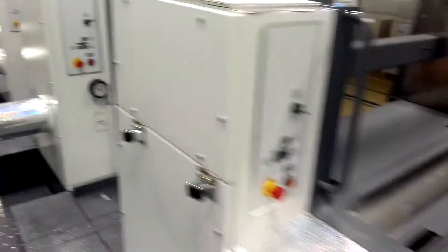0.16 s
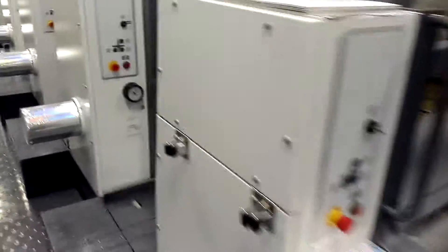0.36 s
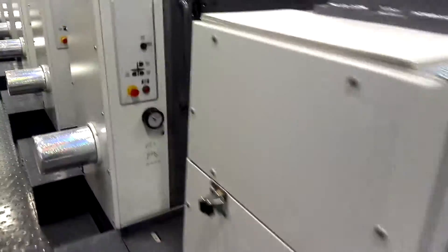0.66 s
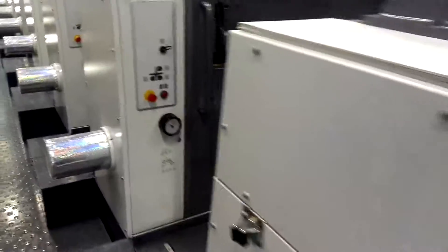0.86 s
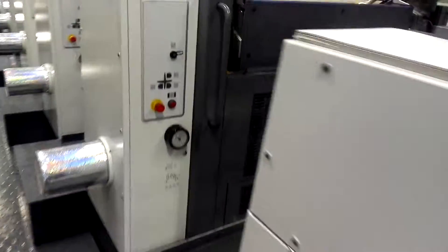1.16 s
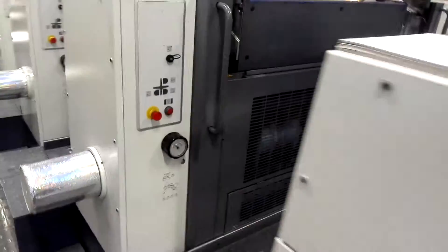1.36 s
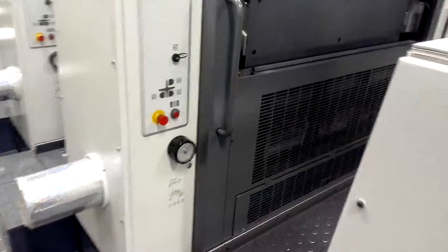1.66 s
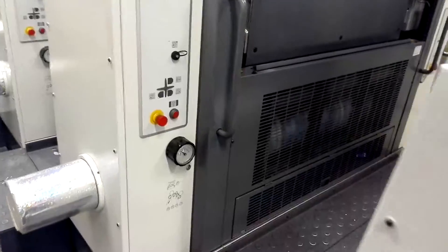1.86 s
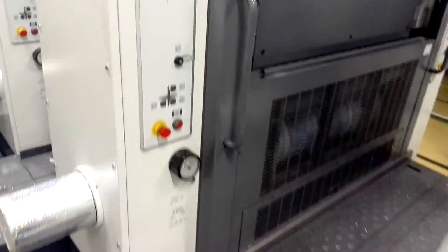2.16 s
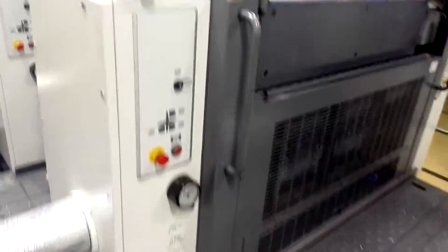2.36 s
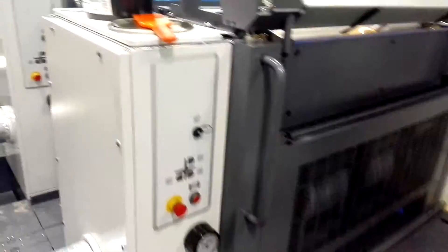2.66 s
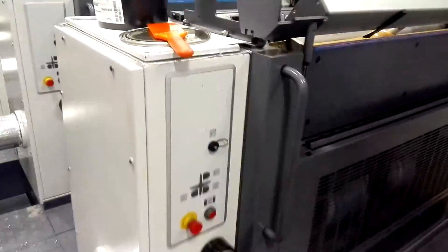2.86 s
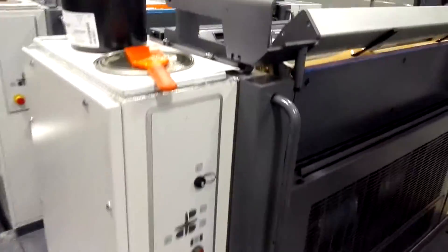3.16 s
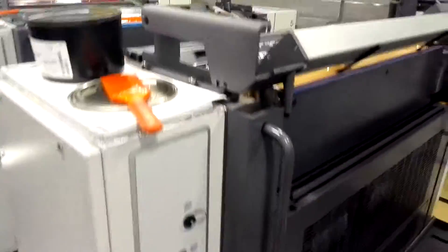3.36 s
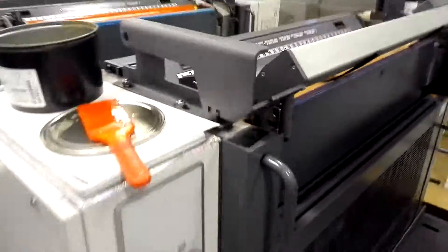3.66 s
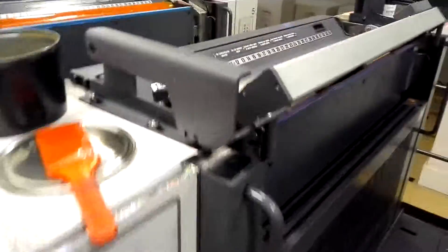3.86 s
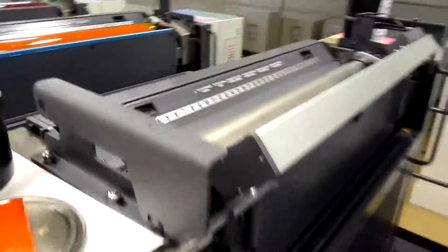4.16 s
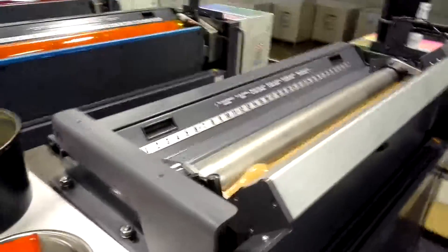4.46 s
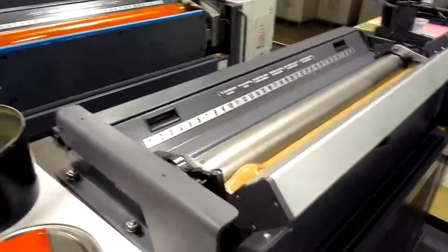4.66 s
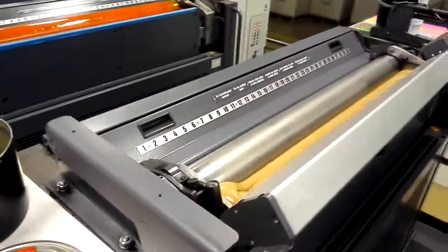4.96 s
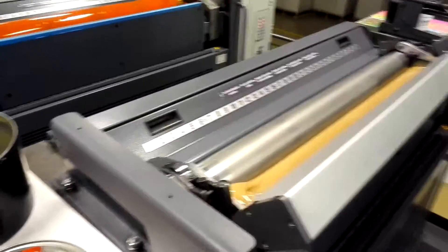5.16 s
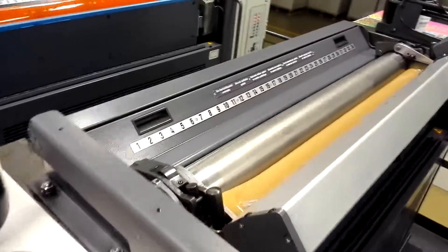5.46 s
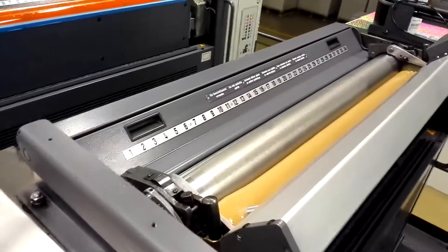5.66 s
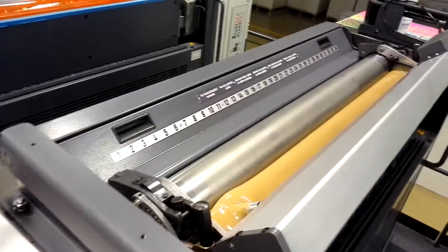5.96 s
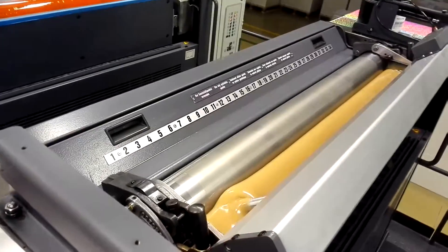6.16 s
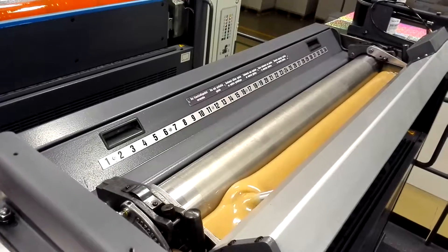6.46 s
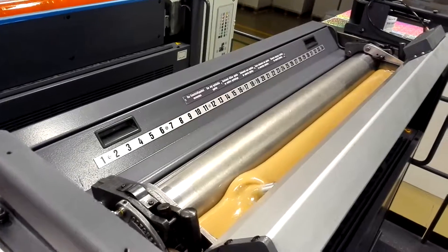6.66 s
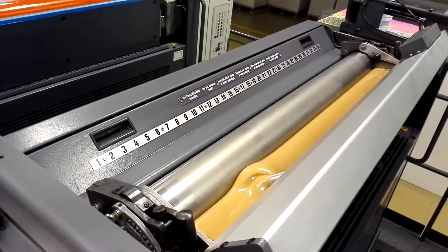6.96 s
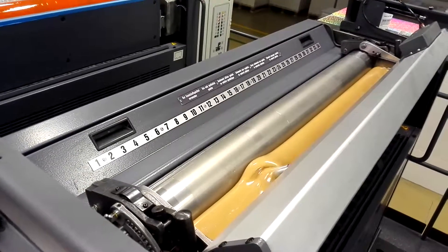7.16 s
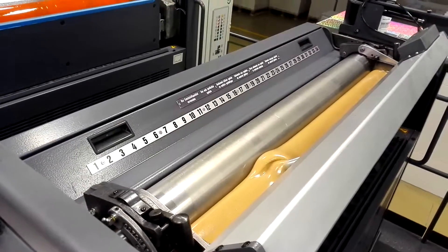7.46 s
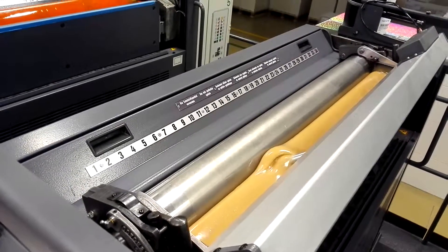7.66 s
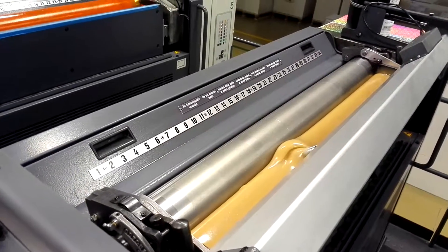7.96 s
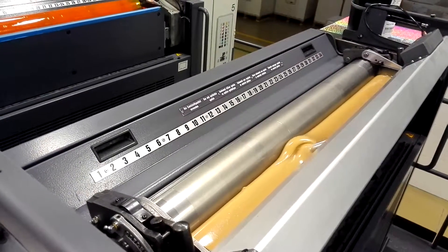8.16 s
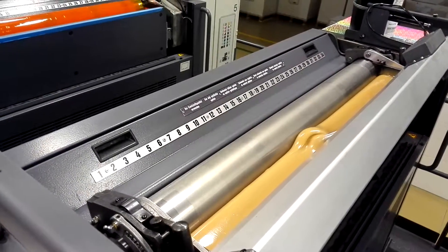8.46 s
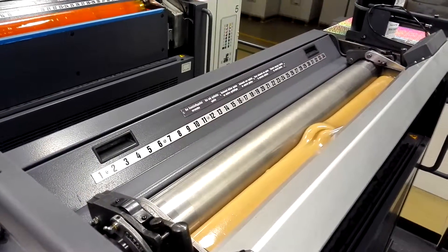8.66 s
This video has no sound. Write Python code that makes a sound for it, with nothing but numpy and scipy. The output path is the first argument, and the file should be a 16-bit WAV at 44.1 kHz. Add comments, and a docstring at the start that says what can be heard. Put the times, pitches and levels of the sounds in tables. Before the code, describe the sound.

Close, wide stereo sound of printing machinery at constant speed. Broad motor and blower noise fills the space, its grinding texture recurring each turn of the cylinders. Five clacks per turn rattle through steel, with dull frame knocks and faint loose ticking. Low hum swells and fades, and thin whines persist. After moving out from between cabinets the roar eases a little, then hiss slowly grows over the ink trough.

```python
"""Printing press, close pair on the move

A sheet-fed press runs in a hall; two spaced microphones move from beside its cabinets to above an ink fountain.
Motors and blowers make a steady din of shaped noise, and looped noise brings much of the rumble back each turn
of the cylinders. Gears hum and whine as wavering sines. Grippers and cams clack five times a turn as noise
bursts through steel resonances; the frame knocks in decaying low sines and loose parts tick faintly."""
import sys
import numpy as np
from scipy import signal
from scipy.fft import rfft, irfft
from scipy.io import wavfile
from scipy.ndimage import uniform_filter1d

SR = 44100
rng = np.random.default_rng(int(sys.argv[2]) if len(sys.argv) > 2 else 0)


def store_pcm(level_fs):
    """Save levels as 16-bit WAV."""
    pcm = np.round(np.clip(level_fs, -1, 1) * 32767).astype(np.int16)
    wavfile.write(sys.argv[1], SR, np.atleast_2d(pcm).T)


N = 388962  # samples

SHEETS_PER_S = 2.8357  # turns of the cylinders a second

# Spectra of the din; each layer's level is set apart: (frequency [Hz], relative density [dB per Hz])
RUMBLE_SHAPE = [(12, -50), (22, -23), (32, -36), (45, -28), (58, -26), (75, -19.5), (90, -6.5), (100, -1.5),
                (125, -2), (165, -2.5), (250, -3), (300, -1), (345, -4.5), (385, -12.5), (470, -22.5),
                (610, -55)]  # frames and floor
ROAR_SHAPE = [(300, -28), (420, -2.5), (480, -8), (590, -7), (700, -6), (800, -2), (900, -3), (1330, -5.5),
              (1620, -5), (1900, -8.5), (2400, -17), (3100, -53)]  # blowers and rollers
HISS_SHAPE = [(1290, -19), (2200, 2.5), (3200, 2), (3640, 2), (4270, 0), (5770, 0), (7070, -4),
              (7600, -11.5), (9880, -69), (16700, -120)]  # air jets and tacky ink
SIZZLE_SHAPE = [(5530, -50), (9400, -5.5), (9800, -1), (10300, -2), (13300, -10.5), (14300, -16.5)]  # top of the hiss
SIZZLE_DB = -43.5  # mean level of the sizzle
# Levels of the din: (dB between the cabinets, dB out in the open)
RUMBLE_DB, ROAR_DB, HISS_DB = (-20.4, -22.5), (-25, -26.5), (-28.5, -31)
STEP_OUT_S = (2.6, 2.7)  # the microphones leave the cabinets: (from s, to s)
HISS_CREEP_DB_PER_S = 0.18  # growth of the hiss from then on, leaning in over the rollers

# Likeness of the two microphones: (frequency [Hz], left-right likeness [0-1])
LIKENESS = [(20, .995), (60, .995), (140, .97), (210, .92), (320, .72), (490, .3), (1000, .25), (2000, .2),
            (4000, .1), (14000, .08)]
# Balance of the two microphones: (frequency [Hz], left-right difference [dB])
BALANCE = [(60, 0), (740, 0), (1130, -2.5), (1710, -4), (2610, -1.5), (3960, -2.5), (6030, -5),
           (9160, -2.5), (13900, 0)]
# Phase between the spaced microphones: (frequency [Hz], lead of the left [rad])
LEFT_LEAD = [(60, 0), (340, -.1), (450, .2), (600, 1), (1030, 1.1), (1810, -1.4), (2840, -3.9), (7920, -22),
             (14100, -38)]
# Balance as the pair turns: (time [s], left-right difference [dB])
HEADING_PATH = [(0, -5), (1.2, -3.5), (2.6, -4), (3.6, -5), (5.2, -2.5), (6.2, -3.5), (8.82, -5)]
# Place of the pair: (time [s], height [0 beside the cabinets to 1 above the fountain])
HEIGHT_PATH = [(0, 0.34), (2.3, 0.0096), (3.6, 1), (8.82, 1)]

# Noise that recurs with the cylinders: (frequency [Hz], share of power recurring each turn [0-1])
RECURRING = [(95, .2), (125, .7), (380, .7), (450, .35), (2400, .3)]
# Change of the recurring pattern along the walk: (time [s], patterns passed [count])
PATTERN_PATH = [(0, 0), (5, 4), (8.82, 4.8)]

# Motor hum, swelling and fading unevenly as motors beat: (time [s], level [dB])
HUM_LEVEL = [(0, -34), (.2, -29), (.55, -25.5), (1.05, -48), (1.85, -39), (2.1, -25.5), (2.5, -22),
             (2.8, -33.5), (3.5, -37.5), (4.05, -30), (4.6, -37), (5.45, -27.5), (6.2, -48), (7, -27.5),
             (7.9, -50), (8.25, -23), (8.45, -41), (8.82, -36)]
HUM_HZ, HUM_LAG = 108.5, .04  # lag: radians by which the right trails
# Drive gear tone, without its sidebands: (time [s], level [dB])
DRIVE_LEVEL = [(0, -27.5), (.8, -35), (1.6, -25), (2.6, -27), (3.6, -35.5), (4.6, -33.5), (8.82, -34)]
# Uneven load on the drive gear: (offset from its tone [turn rates], level against the tone [dB])
LOAD_SIDEBANDS = [(1, -4), (3, -8), (5, -5), (-5, -9), (-1, -10)]
CALM_S, CALM_DB = (3.6, 3.7), -12  # the throb weakens above the fountain: (from s, to s), by dB
# Tooth mesh, before its swell: (time [s], level [dB])
MESH_LEVEL = [(0, -41), (.6, -46), (1.15, -30.5), (2.2, -34.5), (2.7, -42), (3.6, -48), (4.05, -36),
              (4.9, -41), (5.6, -51), (8.82, -50)]
# Whine at twice the mesh: (time [s], level [dB])
DOUBLE_MESH_LEVEL = [(0, -30), (.7, -44), (1.15, -32), (1.8, -49), (2.4, -27.5), (2.9, -35.5), (3.2, -34),
                     (4.5, -44), (5.3, -31), (6.2, -29.5), (7.6, -31.5), (8.82, -31.5)]
MESH_TEETH, MESH_PEAK = 144, .42  # teeth a turn; share of the turn at which they bear hardest
MESH_THROB, MESH_LAG = .7, -.5  # depth of that swell, 0-1; radians by which the right trails
# Fainter whines, about which the level drifts: (frequency [Hz], level beside the cabinets [dB],
# level above the fountain [dB], left-right difference [dB], lag of the right [rad])
FAINT_WHINES = [(794.4, -43, -42, -1, -.9), (1224.9, -40, -47, 0, -.3), (1384, -46, -52, -5, 1),
                (1633.5, -47, -46, -4, -1.9), (1667.5, -45, -44, -6, -1.1), (2042, -52, -50, -2, -1.8),
                (2361.5, -51, -52, -4, -1.9)]

# Clacks in one turn: (place [share of the turn], mean level beside the cabinets [dB],
# mean level above the fountain [dB], t60 [s], brightness [dB per octave], left-right difference [dB])
CAM_CLACKS = [(.092, -21, -20, 0.21, -3, -2.5), (.232, -25, -23, 0.1, -1.5, -3.5),
              (.445, -19, -20, .1, -2, -1.5), (.6, -44, -24.5, 0.088, 2, -4),
              (.845, -25, -23, 0.17, 1, -2.5)]
# Resonances of the steel: (frequency [Hz], width at -6 dB [Hz], relative level [dB])
STEEL_MODES = [(1600, 500, -3.5), (2924, 340, 3), (3660, 410, 5), (4450, 1400, -4), (5530, 2300, 1),
               (10200, 2400, -10)]
# Knocks in one turn: (place [share of the turn], mean level beside the cabinets [dB],
# mean level above the fountain [dB], frequency [Hz], t60 [s])
FRAME_KNOCKS = [(.0, -36, -24, 312, 0.082), (.11, -31, -27, 289, 0.17), (.11, -39, -23, 136, 0.064),
                (.28, -18, -24, 163, 0.18), (.44, -27, -12, 213, 0.061), (.5, -13, -25, 158.4, 0.21),
                (.52, -23, -22, 315.3, 0.13), (.68, -19, -24.5, 326, 0.099), (.69, -22, -21, 193, 0.063),
                (.78, -25, -20, 339, 0.1), (.9, -24, -18, 273, 0.12)]
NEARER_S = .006  # blows arrive this much sooner above the fountain
RATTLES_PER_S, RATTLE_DB = 130, -42  # loose ticks a second; their overall level

GAP_HZ, EDGE_HZ = (7800, 9420), 14250  # a silent band in the treble; the upper band limit


def gain_of(db):
    """Decibels to an amplitude factor."""
    return 10 ** (np.asarray(db) / 20)


def evened(x):
    """Scale to rms 1."""
    return x / np.sqrt(np.mean(x ** 2) + 1e-20)


def read(points, hz):
    """Read a table over frequency, joined on a log axis."""
    f, value = np.transpose(points)
    return np.interp(np.log(hz + 1), np.log(f + 1), value)


def follow(rows, t):
    """Read the columns of a curve at times t."""
    s, *columns = np.transpose(rows)
    return [np.interp(t, s, c) for c in columns]


def height_at(t):
    """Place of the pair: 0 beside the cabinets, 1 above the fountain."""
    return np.clip(follow(HEIGHT_PATH, t)[0], 0, 1)


def sides(db):
    """Gains of left and right for a left-right level difference."""
    return gain_of(np.multiply.outer([.5, -.5], db))


def drift(per_s):
    """Slow chance of rms 1: sines of random phase up to a rate."""
    t = np.arange(0, N + 2048, 1024) / SR
    slow = 0
    for f in per_s * np.geomspace(.1, 1, 20):
        slow = slow + np.sin(2 * np.pi * (f * t + rng.random()))
    return np.interp(np.arange(N) / SR, t, evened(slow))


def pair(hz, one, other):
    """Left and right spectra from two draws, alike and shifted as for spaced microphones."""
    same = np.clip(read(LIKENESS, hz), 0, 1)
    lead = read(LEFT_LEAD, hz)
    right = same * np.exp(-1j * lead) * one + np.sqrt(1 - same ** 2) * other
    mono = np.sqrt(1.001 + same * np.cos(lead))  # dividing by this evens the sum of the two sides
    return np.array([one, right]) * sides(read(BALANCE, hz)) / mono


def din_levels(t):
    """Rumble, roar and hiss drop on stepping out from between the cabinets; then the hiss creeps up."""
    rumble_db, roar_db, hiss_db = (np.interp(t, STEP_OUT_S, ends) for ends in (RUMBLE_DB, ROAR_DB, HISS_DB))
    creep_db = HISS_CREEP_DB_PER_S * np.maximum(t - STEP_OUT_S[1], 0)
    return rumble_db, roar_db, hiss_db + creep_db


def each_turn(rows):
    """Start sample, level at the pair's height and the other columns of every blow."""
    for turn in range(int(N / SR * SHEETS_PER_S) + 1):
        for share, low_db, high_db, *rest in rows:
            s = (turn + share) / SHEETS_PER_S
            height = height_at(s)
            start = max(round((s - NEARER_S * height) * SR), 0)
            yield start, low_db + height * (high_db - low_db), rest


def din():
    """Motors, blowers and air: random short-time spectra in four layers, with patches and a shared flicker."""
    frames, hz = N // 256 + 5, np.fft.rfftfreq(1024, 1 / SR)[:, None]
    a, b, c, d, patches = rng.standard_normal((frames, 513, 5)).T
    patches = uniform_filter1d(patches, size=5, axis=0)  # over frequency
    patches = evened(uniform_filter1d(patches, size=6, axis=1))  # over time
    flicker = evened(uniform_filter1d(rng.standard_normal(frames), size=2))
    t = np.arange(frames) * 256 / SR
    rumble_db, roar_db, hiss_db = din_levels(t)
    sizzle_db = SIZZLE_DB + .4 * (hiss_db - hiss_db.mean())
    # (spectrum, level [dB], patchiness [dB rms], flicker [dB rms])
    layers = [(RUMBLE_SHAPE, rumble_db, .3, .1), (ROAR_SHAPE, roar_db, 1.2, .3),
              (HISS_SHAPE, hiss_db, 1.4, .5), (SIZZLE_SHAPE, sizzle_db, 2.5, .5)]
    power = 0
    for shape, level_db, patchy_db, flicker_db in layers:
        colour = gain_of(2 * read(shape, hz))
        moving_db = level_db + flicker_db * flicker + patchy_db * patches
        power += colour / colour.sum() * gain_of(2 * moving_db)
    # leave room for the share that turning() repeats
    fresh = 1 - read(RECURRING, hz) * (hz < 2400)
    # the bass keeps its balance while the rest swings with the heading
    pan_db = follow(HEADING_PATH, t)[0]
    swing = sides((hz > 450) * (pan_db - pan_db.mean()))
    # the 3 makes up for level lost where random frames overlap
    spectra = pair(hz, a + 1j * b, c + 1j * d) * np.sqrt(3 * power * fresh) * swing
    return signal.istft(spectra, nperseg=1024, noverlap=768)[1][:, :N]


def turning():
    """Gears and bearings grind alike each turn: looped noise patterns that fade into one another along the walk."""
    t, size = np.arange(N) / SR, 2 ** 14  # points in one turn
    hz = np.arange(size // 2 + 1) * SHEETS_PER_S
    place = (t * SHEETS_PER_S % 1 * size).astype(int)
    morph, out = follow(PATTERN_PATH, t)[0], np.zeros((2, N))
    rumble_db, roar_db, _ = din_levels(t)
    for shape, level_db in [(RUMBLE_SHAPE, rumble_db), (ROAR_SHAPE, roar_db)]:
        colour = gain_of(2 * read(shape, hz))
        strength = size * np.sqrt(colour / colour.sum() * read(RECURRING, hz) / 2)
        for k in range(6):
            a, b, c, d = rng.standard_normal((4, len(hz)))
            pattern = irfft(pair(hz, a + 1j * b, c + 1j * d) * strength)
            on = abs(morph - k) < 1
            fade = np.cos(np.pi / 2 * (morph[on] - k))
            out[:, on] += pattern[:, place[on]] * (fade * gain_of(level_db[on]))
    return out


def tone(hz, lag, waver_hz):
    """A sine of rms 1 whose pitch wavers a little, trailing on the right by lag radians."""
    cycles = np.cumsum(hz + waver_hz * drift(2.08)) / SR + rng.random()
    return np.sqrt(2) * np.sin(2 * np.pi * cycles - np.array([[0], [lag]]))


def drive_gear(t):
    """Sidebands at multiples of the turn rate make the drive gear throb, hardest a third into each turn."""
    turn = 2 * np.pi * (SHEETS_PER_S * t - .34)
    throb = sum(gain_of(db) * np.exp(1j * k * turn) for k, db in LOAD_SIDEBANDS)
    throb = 1 + throb * gain_of(np.interp(t, CALM_S, (0, CALM_DB)))
    carrier = np.exp(1j * (111 * turn + np.array([[0], [.3]])))  # 111 cycles a turn; the right leads
    return gain_of(follow(DRIVE_LEVEL, t)[0]) * (throb * carrier).real * np.sqrt(2)


def tooth_mesh(t):
    """Teeth meeting give a tone that swells once a turn, and a whine at twice its pitch."""
    mesh_hz = MESH_TEETH * SHEETS_PER_S
    bearing = 1 + MESH_THROB * np.cos(2 * np.pi * (SHEETS_PER_S * t - MESH_PEAK))
    mesh = gain_of(follow(MESH_LEVEL, t)[0]) * bearing * tone(mesh_hz, MESH_LAG, .06)
    return mesh + gain_of(follow(DOUBLE_MESH_LEVEL, t)[0]) * tone(2 * mesh_hz, MESH_LAG, .06)


def faint_whines(t):
    """Steady higher tones whose levels drift and change with the height of the pair."""
    height, out = height_at(t), 0
    for hz, low_db, high_db, pan_db, lag in FAINT_WHINES:
        level_db = low_db + height * (high_db - low_db) + 2 * drift(2.2)
        out = out + gain_of(level_db) * sides(pan_db)[:, None] * tone(hz, lag, .3)
    return out


def gears():
    """Motor hum, a wavering sine, with the drive gear, tooth mesh and fainter whines."""
    t = np.arange(N) / SR
    hum = gain_of(follow(HUM_LEVEL, t)[0]) * tone(HUM_HZ, HUM_LAG, .06)
    return hum + drive_gear(t) + tooth_mesh(t) + faint_whines(t)


def clacks():
    """Each gripper or cam blow is a rattling noise burst through the steel's broad resonances."""
    t, out = np.arange(4096) / SR, np.zeros((2, N + SR))
    hz = np.fft.rfftfreq(4096, 1 / SR)
    steel = np.sqrt(sum(gain_of(2 * db) / (1 + (2 * (hz - f) / width) ** 2) ** 2
                        for f, width, db in STEEL_MODES))
    for at, db, (t60, tilt_db, pan_db) in each_turn(CAM_CLACKS):
        shared, left, right = rng.standard_normal((3, 4096))
        # the shared part reaches the left 20 samples later
        burst = .5 * np.array([np.roll(shared, 20), shared]) + np.array([left, right])
        tilt = gain_of(tilt_db * np.log2(hz / 4000 + 0.043))  # the offset keeps 0 Hz finite
        burst = evened(irfft(rfft(burst) * steel * tilt))
        burst *= np.minimum(t / 0.0055, 1) * gain_of(-60 * t / t60) * sides(pan_db)[:, None]
        out[:, at:at + 4096] += gain_of(db + 1.5 * rng.standard_normal()) * burst
    return out[:, :N]


def knocks():
    """Each knock of the frame is a low panel mode with a soft start, nearly alike every turn."""
    t, out = np.arange(6000) / SR, np.zeros(N + SR)
    for at, db, (hz, t60) in each_turn(FRAME_KNOCKS):
        ring = np.sin(2 * np.pi * hz * t) * (1 - np.exp(-t / 0.0046)) * gain_of(-60 * t / t60)
        out[at:at + 6000] += gain_of(db + 0.6 * rng.standard_normal()) * ring
    return out[:N]


def rattle():
    """Loose parts tick faintly at random, each ringing briefly at its own pitch, nearer one side or the other."""
    t, out = np.arange(900) / SR, np.zeros((2, N + 900))
    for when, pitch, size, side in rng.random((1400, 4))[:int(RATTLES_PER_S * N / SR)]:
        hz = 1100 * 6.5 ** pitch
        ring = np.sin(2 * np.pi * hz * t) * gain_of(-60 * t / .02 + 9 * size)
        at = int(when * N)
        out[:, at:at + 900] += ring * sides(12 * (side - .5) - 2.5)[:, None]
    return gain_of(RATTLE_DB) * evened(out[:, :N])


def scene():
    """All parts of the press together."""
    return din() + turning() + gears() + clacks() + knocks() + rattle()


def record(dry):
    """One linear-phase filter silences a band of treble and everything above the band limit."""
    taps = signal.firwin(1023, [*GAP_HZ, EDGE_HZ], window=("kaiser", 10), fs=SR)
    return signal.oaconvolve(dry, taps[None], "same")


dry = scene()
out = record(dry)
store_pcm(out)
```